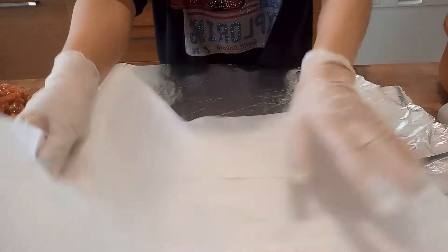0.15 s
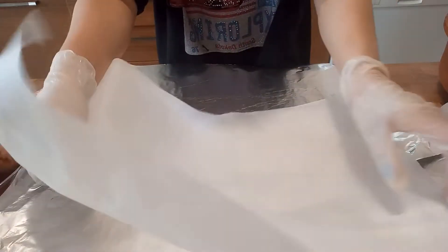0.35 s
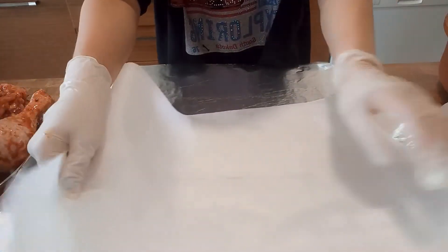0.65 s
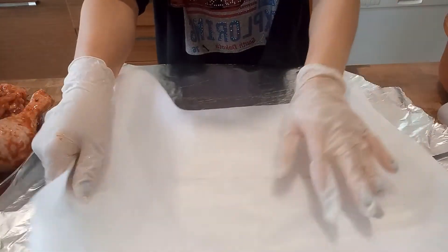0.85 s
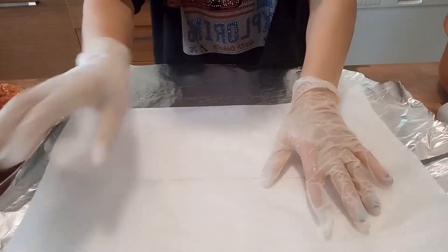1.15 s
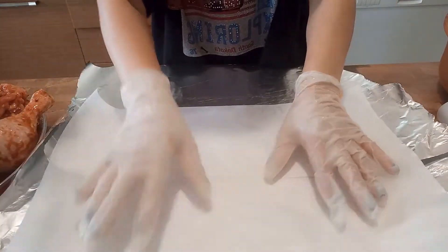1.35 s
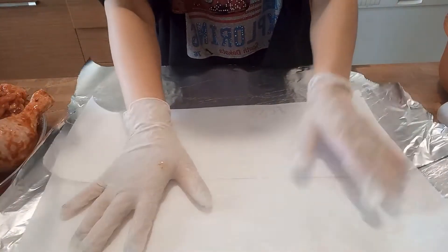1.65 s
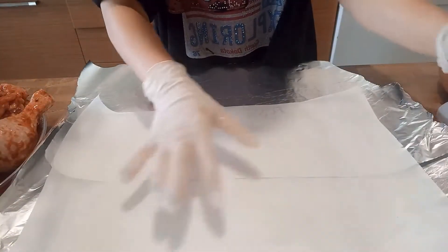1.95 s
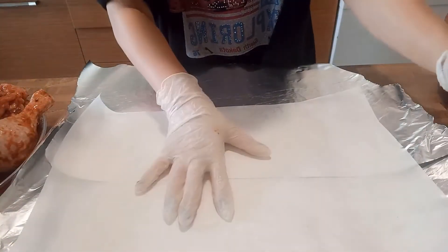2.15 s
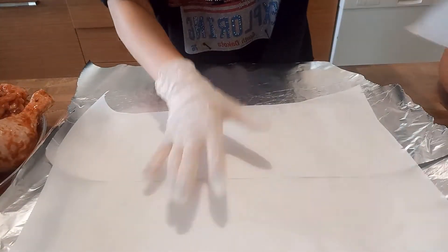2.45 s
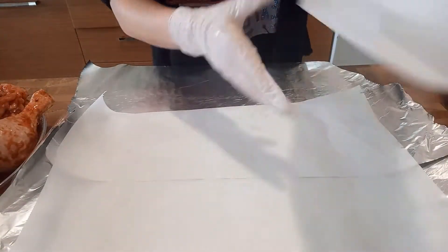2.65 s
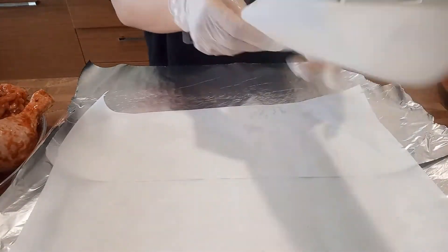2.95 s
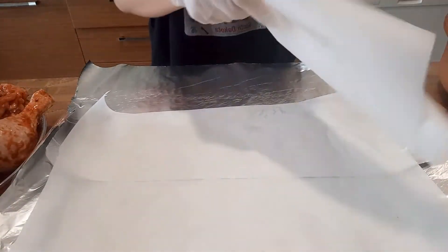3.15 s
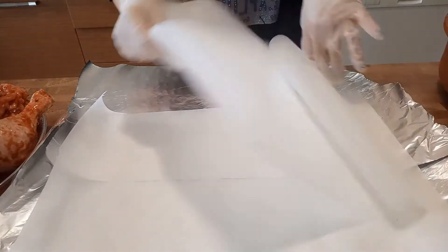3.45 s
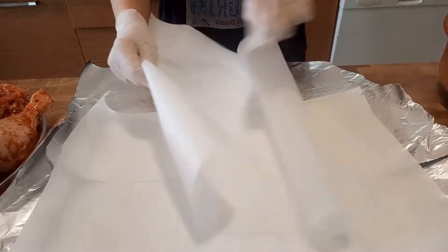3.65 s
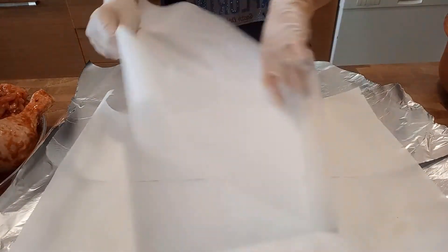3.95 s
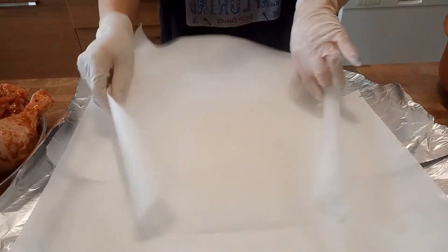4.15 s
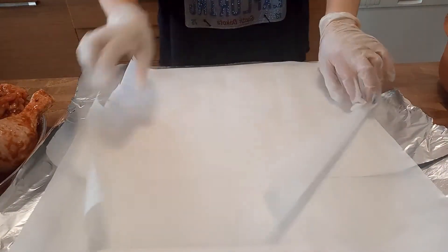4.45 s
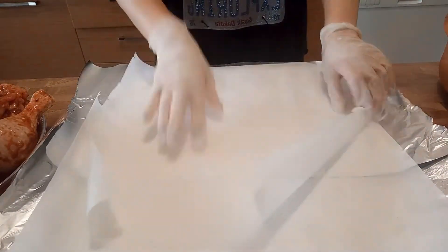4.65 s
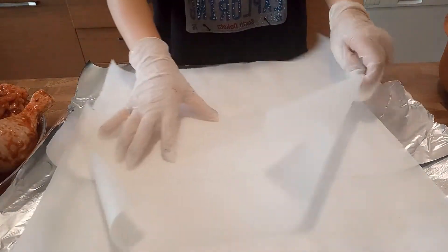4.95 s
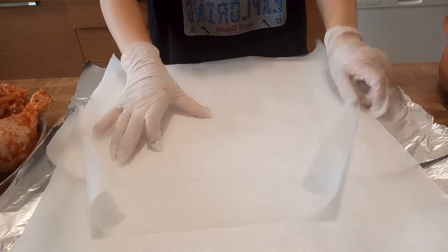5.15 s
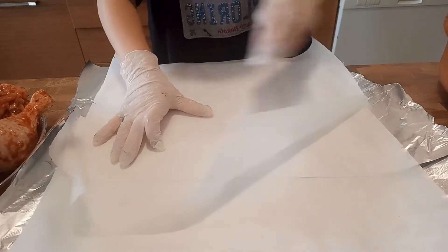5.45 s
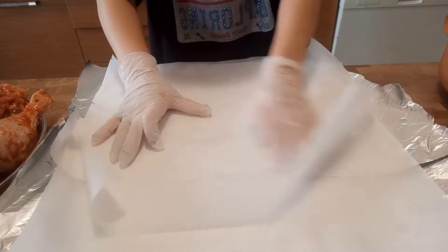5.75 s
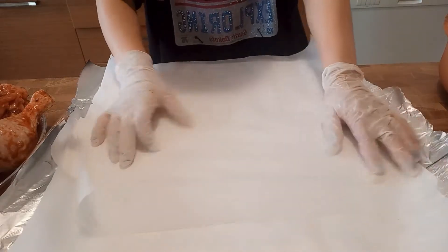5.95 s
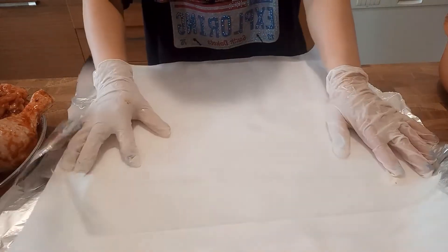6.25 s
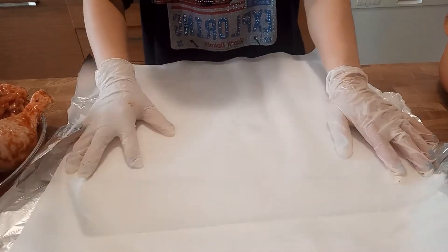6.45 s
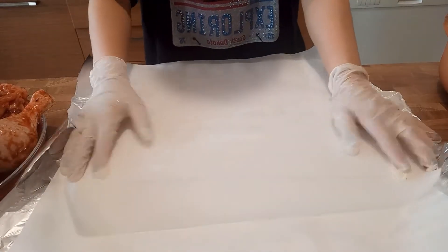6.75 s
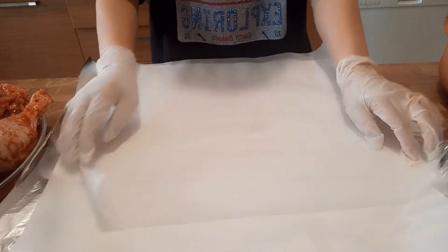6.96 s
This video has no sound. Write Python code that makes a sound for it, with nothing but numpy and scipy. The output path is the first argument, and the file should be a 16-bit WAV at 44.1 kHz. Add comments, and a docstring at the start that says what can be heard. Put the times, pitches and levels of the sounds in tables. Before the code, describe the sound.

A close, dry stereo sound of gloved hands handling large sheets of baking paper on a kitchen counter, over faint low appliance hum and soft room noise. From 0 to 1.3 seconds, short rustling swipes overlap with bright crease snaps and one tiny low puff of air. At about 1.5 a strong, hissy swipe arrives with a sharp tick and a dull counter shudder. Around 2.0 to 2.4 a longer sliding rub carries a faint singing friction tone. It grows quiet until about 2.9, then a sheet swings and bends, loudest and most crackly from 3.2 to 4.2, with hard snaps and a low counter drone near 3.9. Lighter rustles and scattered snaps follow, with a very faint higher squeak near 4.5. From 5.6 to 7.1, broad smoothing strokes brush the paper, with few small ticks and low shudders near 5.7 and 6.7.

```python
"""Gloved hands slide over baking paper on a kitchen counter, and creases snap from the very start.
The counter soon drones for a moment, as it does again whenever the hands bear on it.
Then sheets are dragged and bent, with faint singing tones and the densest snaps; last come smoothing strokes.
Paper sounds are filtered noise broken into tiny buckles; drones are wavering tones with rumble.
A faint appliance hum and soft room noise last throughout."""
import sys
import numpy as np
from scipy import signal
from scipy.fft import rfft, irfft, next_fast_len
from scipy.io import wavfile
from scipy.ndimage import map_coordinates

SR = 44100
rng = np.random.default_rng(int(sys.argv[2]) if len(sys.argv) > 2 else 0)


def generate_wav(signal):
    """Clip the signal to [-1, 1] and save it as 16-bit WAV at the path in sys.argv[1]."""
    frames = np.transpose(np.atleast_2d(signal))
    scaled = np.clip(frames, -1, 1) * 32767
    pcm = np.round(scaled).astype(np.int16)
    wavfile.write(sys.argv[1], SR, pcm)


N = 312826  # length in samples

# Levels in these tables are starting points; the functions below add small trims.
# A glove slides over the paper: start_s, rise_s, hold_s, fade_s, rustle_db,
# hiss_db (relative to rustle), flex_db (relative to rustle)
GLOVE_STROKES = [(-0.01, 0.0085, 0.016, 0.57, -37.5, -4.5, -9), (0.294, 0.026, 0.042, 0.19, -34, -1, -9.5),
                 (0.651, 0.009, .04, 0.22, -38, -5, -3.5), (0.728, 0.017, 0.076, 0.25, -34.5, -6, -6.5),
                 (0.919, 0.0075, 0.035, 0.079, -33.5, -5, -4.5), (0.973, 0.049, 0.055, 0.18, -30, -1, -11),
                 (1.121, 0.032, 0.058, 0.093, -33, -1, -10.5), (1.272, 0.016, .01, 0.12, -39.5, -0.5, -23),
                 (1.42, .02, .01, 0.096, -56, 0, -13), (1.472, 0.057, 0.0054, 0.17, -27, 1.5, -11.5),
                 (1.654, .025, .015, 0.13, -40, -2, -15), (1.765, 0.08, 0.024, .12, -48.5, 0, -11.5),
                 (1.896, 0.022, 0.011, 0.13, -57.5, 4, -2.5), (1.993, 0.031, 0.025, .05, -42, -4, -5),
                 (2.029, 0.029, 0.28, 0.14, -29, -3, -8), (2.416, .015, .015, 0.073, -41, -3, -3.5),
                 (2.521, 0.027, 0.066, 0.16, -42, -9, -7.5), (4.228, 0.065, .1, 0.029, -41.5, -1.5, -10),
                 (4.662, 0.041, 0.05, 0.2, -42, -1, -5), (5.035, 0.045, 0.032, 0.26, -36, -4, -5.5),
                 (5.4, .03, 0.011, 0.12, -52.5, 0, 4), (5.512, 0.016, 0.0089, 0.064, -50.5, -0.5, -7),
                 (5.739, 0.064, 0.017, 0.17, -31.5, -5.5, -7),
                 (5.82, 0.095, 0.038, 0.18, -29.5, -1.5, -18.5),
                 (5.939, 0.12, 0.19, 0.21, -31.5, -3, -12.5), (6.341, 0.031, 0.032, 0.12, -32.5, -2, -15.5),
                 (6.478, 0.013, 0.006, 0.15, -33.5, 0, -14), (6.626, 0.073, 0.31, 0.17, -40.5, -4, -14.5),
                 (6.895, 0.035, 0.17, .2, -36, -2.5, -16)]
# A sheet is swung, bent or laid down: start_s, rise_s, hold_s, fade_s, flex_db,
# rustle_db (relative to flex), billow_db (relative to flex)
SHEET_BENDS = [(0.071, 0.093, 0.023, .2, -30.5, 5.5, -8.5), (0.557, 0.04, 0.027, .14, -44.5, 0.5, -14.5),
               (2.058, .12, 0.016, 0.13, -28.5, -18, -14), (2.434, 0.048, 0.016, 0.073, -37, 3.5, -22),
               (2.73, .015, 0.017, 0.41, -50.5, -2.5, -21), (2.904, 0.052, 0.043, 0.29, -34.5, 0, -11.5),
               (3.121, 0.026, 0.056, 0.35, -31.5, -6, -17.5), (3.218, 0.024, 0.014, .22, -33.5, 5, -3.5),
               (3.323, .04, 0.052, 0.4, -26, -1, -14), (3.41, 0.033, 0.0086, 0.054, -23, 0.5, -24),
               (3.513, 0.023, 0.033, 0.25, -35, 4.5, -17), (3.784, 0.021, .075, 0.19, -26.5, -1.5, -14.5),
               (3.943, 0.018, 0.01, 0.16, -30, 0.5, -7.5), (4.076, 0.054, 0.084, 0.24, -35, 4, -16),
               (4.453, 0.021, 0.045, 0.42, -54, 5.5, -26), (4.705, 0.064, 0.018, 0.13, -37.5, 0.5, -16),
               (4.814, 0.065, 0.054, 0.33, -36.5, 3.5, -14), (5.115, 0.044, 0.034, 0.52, -48.5, 7.5, -25),
               (5.625, 0.016, .015, .18, -42.5, -2.5, -18)]
# Creases that buckle: start_s, level_db, low_crack_db (relative to level), top_sizzle_db (relative to level)
CREASE_SNAPS = [(0.086, -30, -6, 0), (0.151, -24, -2, 5.5), (0.18, -21.5, -14, 1), (0.578, -34, -5.5, -14),
                (0.658, -25, -18, -8), (0.726, -27.5, -20, -2), (0.776, -18.5, -11.5, -7),
                (0.837, -24.5, -7, -6), (0.933, -16.5, -12.5, -3), (0.971, -26, -17, -19),
                (1.475, -34, -16, -5), (1.497, -27, -18, -8), (1.518, -14, -28, -2), (2.046, -38, -17, 1),
                (2.146, -21, -1.5, -19), (2.505, -23, -7.5, -4.5), (2.745, -39, -0.5, -17),
                (2.866, -46.5, 4, -11), (2.922, -30.5, 1, -12), (2.951, -31, 2, -16),
                (3.141, -28.5, -1, -10), (3.204, -25.5, 3, 0.5), (3.239, -21.5, 0.5, 1),
                (3.253, -18.5, 2, -3), (3.259, -18.5, -21, -1), (3.3, -20, -0.5, 0.5),
                (3.446, -22.5, 6, -16), (3.553, -30, 5.5, 3), (3.636, -14.5, -15, -20),
                (3.781, -28, 0.5, -9), (3.869, -11.5, -3, -13), (3.985, -15, -2, -3),
                (4.086, -22, -8.5, -4), (4.094, -18.5, -10, -7), (4.138, -15.5, -32, -2.5),
                (4.547, -45.5, 5.5, -18), (4.709, -26, -9, -3), (4.727, -33.5, 3.5, -9),
                (4.865, -28.5, -2, -16), (4.942, -25.5, -5, -2), (5.004, -37, 9.5, -8),
                (5.09, -22, -16.5, -1), (5.18, -23, -13.5, -7), (5.357, -31.5, -2, -9),
                (5.432, -32, -17, -5), (6.369, -37, -28, -1), (6.623, -30.5, -28, -4),
                (6.657, -31, -21, -7), (6.719, -30, -28, -9), (6.862, -32, -19, 5)]
# A sheet dragged over the one below sings: start_s, rise_s, hold_s, fade_s, level_db, first_hz, last_hz
SINGING_DRAGS = [(1.95, 0.13, 0.0427, 0.36, -48.5, 630, 760), (2.42, 0.153, 0.542, 0.18, -61.5, 860, 895),
                 (4.48, 0.054, 0.017, 0.13, -66, 1300, 470), (4.45, 0.069, 0.035, 0.17, -55, 1550, 1545)]
# Tone colours of the paper, from its wide panels up to its bright edges: pitch_hz, level_db (per hertz)
BILLOW_COLOUR = [(30, -19), (130, -12.5), (250, -10), (400, -9), (520, -3), (700, 3.5), (900, -1.5),
                 (1400, -53), (3000, -101)]
FLEX_COLOUR = [(300, -37), (600, -24.5), (850, -1.5), (1150, -2), (1500, 2), (2100, 1), (2800, -3.5),
               (5000, -7), (12000, -71)]
RUSTLE_COLOUR = [(500, -34.5), (1400, -23), (2300, -5.5), (3200, -2), (4300, 0), (5300, -0.5), (6500, 1.5),
                 (7500, -2.5), (9000, -9.5), (14000, -31)]
HISS_COLOUR = [(2000, -52), (6000, 9.5), (8500, 6), (10500, 2), (12500, 4.5), (14500, 2), (16000, -4.5)]
# Echo of the paper off the counter: time_s, delay_ms, strength (0 to 1)
ECHO_PATH = [(0, 0.42, 0.4), (.3, 0.24, 0.3), (.9, 0.41, 0.62), (1.3, 0.32, 0.05), (1.85, 0.39, 0.16),
             (2.2, 0.26, 0.68), (4.4, 0.53, 0), (4.95, 0.41, 0.04), (5.2, 0.45, 0.77), (5.5, 0.75, 0.23),
             (5.87, 0.48, 0.4), (6.0, 0.44, 0.25), (6.3, 0.48, 0.46), (6.7, 0.47, 0.65), (7.09, 0.55, 0.4)]
# Where the busy hand is: time_s, left_minus_right_db
HAND_PLACE = [(0, 0.5), (1.8, -0.5), (2.0, -1), (2.6, -2), (2.8, .5), (3.55, .5), (4.0, 0), (5.15, -0.5),
              (5.57, .3), (5.94, -1.5), (6.36, 1), (7.09, .2)]
# Air pushed out from under a falling sheet: start_s, level_db, length_s
AIR_PUFFS = [(0.146, -45, 0.035)]
# Tone colour of those puffs: pitch_hz, level_db (per hertz)
PUFF_COLOUR = [(20, -8), (50, 8), (120, -1), (300, -11), (700, -39)]
# A hand bears on the counter: start_s, rise_s, hold_s, fade_s, level_db
COUNTER_PUSHES = [(0.13, 0.026, .01, 0.19, -52), (1.502, 0.1, .03, 0.04, -45.5), (3.24, .06, .015, .1, -54),
                  (3.43, 0.065, .02, .16, -47.5), (3.72, 0.019, 0.084, 0.54, -54),
                  (3.908, .1, 0.086, 0.069, -39), (5.637, 0.033, 0.13, 0.036, -43),
                  (6.621, 0.069, .07, 0.064, -43.5)]
# Lowest resonances of the counter: pitch_hz, level_db
COUNTER_TONES = [(79.5, -0.5), (128, -16.5)]
# Tone colour of the counter's rumble: pitch_hz, level_db (per hertz)
RUMBLE_COLOUR = [(20, -16), (45, -12), (65, 1), (80, 7), (110, 2), (150, -15), (230, -9), (600, -48)]
# How long the kitchen rings, as the time to fall by 60 dB: pitch_hz, ring_s
KITCHEN_RING = [(150, 0.16), (1000, 0.17), (5000, 0.045), (15000, 0.037)]
# Appliance hum: pitch_hz, level_db
HUM_TONES = [(79.5, -66.5), (100, -68)]
# Tone colour of the room noise: pitch_hz, level_db (per hertz)
ROOM_COLOUR = [(20, -23), (50, -3.5), (80, -0.5), (130, 1.5), (170, -6), (300, -8.5), (500, -20),
               (1000, -29), (4000, -26), (16000, -27.5)]
# Response of the microphone: pitch_hz, gain_db
MIC_RESPONSE = [(6900, 1), (7150, -2.5), (7400, -10.5), (8100, -9), (8900, -3.5), (10000, 3)]

MIC_TOP_HZ = 16050  # nothing is heard from here up
STROKE_BILLOW_DB = -13.5  # billowing under a stroke, relative to its flexing
BEND_HISS_DB = -7.5  # hiss of a bend, relative to its rustle
FADE_DB = 17.5  # every movement dies away by this much in its fade time
SNAP_S = 0.0078  # time scale of a crease giving way
HISS_POWER = 1.22  # hiss follows the speed more steeply than the rustle does
BRAKING = 1.16  # above 1, a fade steepens as the hand comes to rest


def sheet():
    """Fibres catch and tiny creases flip; the same buckles drive the wide panels and the bright edges."""
    buckles = crackle(per_second=900, size_db=3.6, life_s=.0009)
    crisp = .36  # share of the sound that comes in buckles
    grip_db = wobble(45)  # the glove catches and lets go
    flexing, rustling, hissing, billowing = handling() * amp(grip_db)
    billow = coloured(amp(-4.0) * billowing * grainy(buckles, crisp, alike=0.8), BILLOW_COLOUR)
    flex = coloured(amp(-2.0) * flexing * grainy(buckles, crisp, alike=0.13), FLEX_COLOUR)
    rustle = coloured(amp(-1.47) * rustling * grainy(buckles, crisp, alike=0.022), RUSTLE_COLOUR)
    hiss = coloured(amp(1.0) * hissing * grainy(buckles, crisp, alike=0.15), HISS_COLOUR)
    return billow + flex + rustle + hiss


def handling():
    """Powers of all strokes and bends add up; returns the gains of flex, rustle, hiss and billow."""
    moves = []
    for *timing, rustle_db, hiss_db, flex_db in GLOVE_STROKES:
        layers_db = rustle_db + np.array([flex_db, 0, hiss_db, flex_db + STROKE_BILLOW_DB])
        moves.append((timing, layers_db))
    for *timing, flex_db, rustle_db, billow_db in SHEET_BENDS:
        layers_db = flex_db + np.array([0, rustle_db, rustle_db + BEND_HISS_DB, billow_db])
        moves.append((timing, layers_db))
    power = np.zeros((4, len(clock())))
    for timing, layers_db in moves:
        speed = movement(*timing)
        layer_speeds = np.array([speed, speed, speed ** HISS_POWER, speed])
        power += (amp(layers_db)[:, None] * layer_speeds) ** 2
    return np.array([per_sample(layer) for layer in np.sqrt(power)])


def movement(start, rise, hold, fade):
    """Gain of one movement: it gathers speed, holds and dies away; all times in seconds."""
    t = clock() - start
    swell = np.sin(np.pi / 2 * np.clip(t / max(rise, .002), 0, 1)) ** 2
    faded = np.clip((t - rise - max(hold, 0)) / max(fade, .01), 0, 10)
    return swell * amp(-FADE_DB * faded ** BRAKING)


def snaps(swell=0.39):
    """A crease gives way in a quick run of buckles; partway through, its main fold flips with a sharp tick."""
    t = np.arange(SR // 8) / SR
    u = t / SNAP_S  # time in snap lengths, as are swell and flip
    power = np.zeros((3, N + SR))
    flips = rng.uniform(.2, .7, len(CREASE_SNAPS))
    for (start_s, level_db, low_db, top_db), flip in zip(CREASE_SNAPS, flips):
        tick = .7 * np.exp(-((u - flip) / .09) ** 2)
        body = (1 - np.exp(-u / swell)) * np.exp(-u ** 2)
        run = amp(level_db) * (body + tick)
        first = round(start_s * SR)
        power[:, first:first + len(t)] += (amp([[low_db], [0], [top_db]]) * run) ** 2
    low, middle, top = np.sqrt(power[:, :N])
    buckles = crackle(per_second=2500, size_db=1.5, life_s=.0004)
    crack = coloured(amp(-1.5) * low * grainy(buckles, share=0.18, alike=0.56), FLEX_COLOUR)
    snap = coloured(amp(-2.16) * middle * grainy(buckles, share=0.11, alike=0.042), RUSTLE_COLOUR)
    sizzle = coloured(amp(-2.2) * top * grainy(buckles, share=0.19, alike=0.08), HISS_COLOUR)
    return crack + snap + sizzle


def crackle(per_second, size_db, life_s):
    """Power of tiny buckles, mean 1: mostly small, a few large, each dying fast."""
    draws = rng.random((2, N))
    sizes = amp(size_db * np.minimum(-np.log(1 - draws[0]), 5))
    power = (draws[1] < per_second / SR) * sizes ** 2
    power = signal.lfilter([1], [1, -np.exp(-1 / (life_s * SR))], power)
    return power / power.mean()


def grainy(power, share, alike):
    """Stereo friction noise of average strength about 1, a share of which comes in buckles."""
    share = np.clip(share, 0, 1)
    return np.sqrt(1 - share + share * power) * spread(rng.standard_normal((2, N)), alike)


def panels(x, depth_db=2.0, width_hz=200, hold_s=0.066, fade_hz=12000):
    """The bending sheet keeps forming fresh panels, each favouring narrow bands; the top stays smoother."""
    hz, t, z = signal.stft(x, SR, nperseg=1024)
    across = np.exp(-((hz - hz.mean()) / (width_hz / 2)) ** 2)
    over_time = np.exp(-((t - t.mean()) / (hold_s / 2)) ** 2)
    blur = np.outer(across, over_time)
    field = unit(signal.fftconvolve(rng.standard_normal(z.shape[1:]), blur, "same"))
    smoother_top = np.sqrt(1 + (hz[:, None] / fade_hz) ** 4)
    gain = unit(amp(depth_db * field / smoother_top))
    return signal.istft(z * gain, SR, nperseg=1024)[1][:, :N]


def drag(width_hz=140):
    """Friction feeds a resonance of the taut sheet, which glides as the sheet is pulled."""
    sound, t = np.zeros((2, N)), np.arange(N) / SR
    for start, rise, hold, fade, level_db, first_hz, last_hz in SINGING_DRAGS:
        glide_end = start + rise + hold + fade / 2
        centre_hz = np.interp(t, [start, glide_end], [first_hz, last_hz])
        tone = np.sin(2 * np.pi * np.cumsum(centre_hz) / SR)
        # slow noise times a tone makes a narrow band around that tone
        flutter = filtered(rng.standard_normal((2, N)), lambda hz: 1 / np.sqrt(1 + (2 * hz / width_hz) ** 4))
        gain = amp(level_db) * per_sample(movement(start, rise, hold, fade))
        sound += gain * unit(flutter * tone)
    return spread(sound, 0.99)


def counter_echo(x, below_hz=1800):
    """The counter mirrors the paper: a hollow in the low mids that moves with the sheet's height."""
    delay_ms, strength = curves(ECHO_PATH)
    late = np.arange(N) - delay_ms * SR / 1000
    dull = filtered(x, lambda hz: 1 / (1 + (hz / below_hz) ** 4))
    echo = np.array([np.interp(late, np.arange(N), side) for side in dull])
    return x + np.clip(strength, 0, 1) * echo


def puffs():
    """A falling sheet squeezes out a soft, low puff of air."""
    t = np.arange(N) / SR
    level = np.zeros(N)
    for start_s, level_db, length_s in AIR_PUFFS:
        half = length_s / 2
        level += amp(level_db) * np.exp(-((t - start_s - half) / half) ** 2)
    return coloured(level * spread(rng.standard_normal((2, N)), 0.64), PUFF_COLOUR)


def counter(waver=0.03):
    """Under a push the counter shudders at its lowest resonances, with a dull rumble around them."""
    push = per_sample(sum(amp(level_db) * movement(*timing) for *timing, level_db in COUNTER_PUSHES))
    drone = np.zeros(N)
    for pitch_hz, level_db in COUNTER_TONES:
        wavering_hz = pitch_hz * (1 + waver * wobble(8.7))
        drone += amp(level_db) * np.sqrt(2) * np.sin(2 * np.pi * np.cumsum(wavering_hz) / SR)
    rumble = coloured(spread(rng.standard_normal((2, N)), 0.6), RUMBLE_COLOUR)
    return push * (drone + .28 * rumble)


def kitchen(x):
    """Cupboards and walls answer with a short diffuse tail: noise whose pitches die at their own pace."""
    hz, t, z = signal.stft(rng.standard_normal((2, SR // 2)), SR, nperseg=256)
    decay = amp(-60 * t / along(KITCHEN_RING, hz)[:, None])
    tail = signal.istft(z * decay, SR, nperseg=256)[1]
    tail = tail / np.linalg.norm(tail[0])
    tail = np.pad(tail, ((0, 0), (SR // 300, 0)))  # starts 1/300 s late
    return signal.fftconvolve(x, tail, axes=1)[:, :N]


def background():
    """An appliance hums, its level and phase drifting, over soft room noise."""
    t = np.arange(N) / SR
    hum = np.zeros(N)
    for pitch_hz, level_db in HUM_TONES:
        gain = amp(level_db + 0.96 * wobble(3.0))
        hum += gain * np.sqrt(2) * np.sin(2 * np.pi * pitch_hz * t + 0.81 * wobble(3.8))
    room_noise = coloured(spread(rng.standard_normal((2, N)), 0.6), ROOM_COLOUR)
    return hum + amp(-63.5) * room_noise


def amp(db):
    """Decibels to gain."""
    return 10 ** (np.asarray(db) / 20)


def unit(x):
    """Scale to an average strength (rms) of 1."""
    return x / np.sqrt(np.mean(x ** 2) + 1e-20)


def along(points, hz):
    """Read (pitch, value) points at any pitch, on a logarithmic pitch axis."""
    f, v = np.transpose(points)
    return np.interp(np.log(hz + 1), np.log(f + 1), v)


def curves(rows):
    """One value per sample for each column after the time."""
    s, *cols = np.transpose(rows)
    return [np.interp(np.arange(N) / SR, s, c) for c in cols]


def wobble(rate):
    """A smooth random curve through this many random points a second."""
    points = rng.standard_normal(int(N * rate / SR) + 4)
    return map_coordinates(points, [np.arange(N) * rate / SR])


def clock(size=32):
    """Times in seconds of the slow controls, one every few samples."""
    return np.arange(0, N + size, size) / SR


def per_sample(control):
    """A slow control, filled in to one value per sample."""
    return np.interp(np.arange(N) / SR, clock(), control)


def filtered(x, response):
    """Multiply the spectrum of x by a gain that depends on pitch."""
    m = next_fast_len(N + SR // 2)
    return irfft(rfft(x, m) * response(np.fft.rfftfreq(m, 1 / SR)), m)[..., :N]


def coloured(x, spectrum, size=4096):
    """Give x a tone colour with a filter of energy 1 that never sounds ahead of its input."""
    cepstrum = irfft(np.log(amp(along(spectrum, np.fft.rfftfreq(size, 1 / SR)))))
    # folding the cepstrum onto positive times gives minimum phase
    cepstrum[1:size // 2] *= 2
    cepstrum[size // 2 + 1:] = 0
    ring = irfft(np.exp(rfft(cepstrum)))
    return signal.oaconvolve(x, ring[None] / np.linalg.norm(ring), axes=1)[:, :N]


def spread(pair, alike):
    """Mix two signals into left and right; unrelated ones of equal strength become this much alike."""
    turn = np.arccos(np.clip(alike, -1, 1)) / 2
    mid, side = np.cos(turn) * pair[0], np.sin(turn) * pair[1]
    return np.array([mid + side, mid - side])


def scene():
    """Paper close by, the counter beneath it and the room around."""
    lean_db = curves(HAND_PLACE)[0]
    paper = counter_echo(panels(sheet() + snaps()) + drag())
    paper = paper * amp([lean_db / 2, -lean_db / 2])
    return paper + puffs() + counter() + amp(-6) * kitchen(paper) + background()


def record(dry):
    """The microphone has a hollow in the treble and a steep band limit."""
    return filtered(dry, lambda hz: amp(along(MIC_RESPONSE, hz)) * (hz < MIC_TOP_HZ))


dry = scene()
out = record(dry)
generate_wav(out)
```